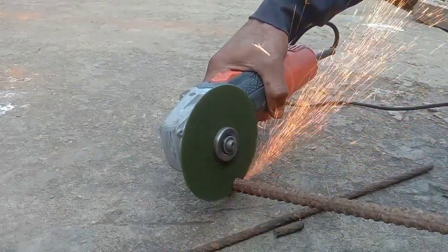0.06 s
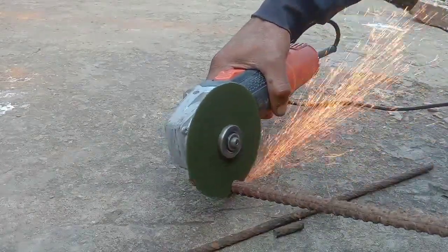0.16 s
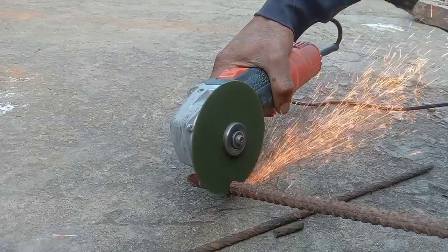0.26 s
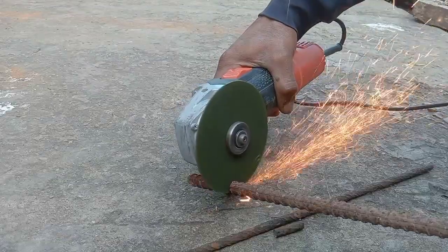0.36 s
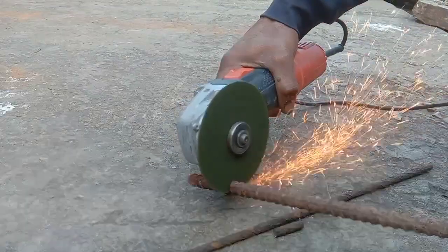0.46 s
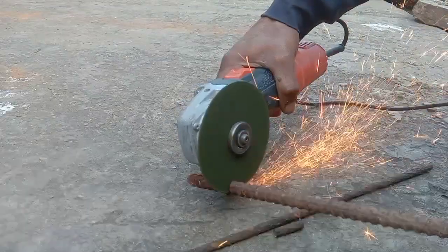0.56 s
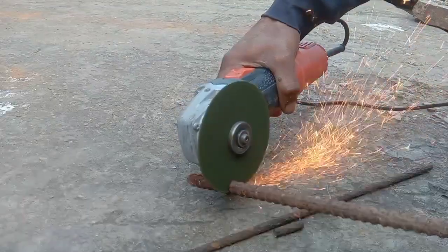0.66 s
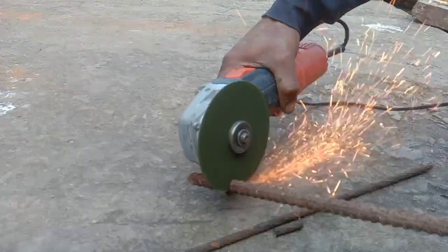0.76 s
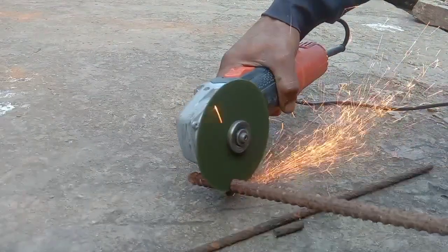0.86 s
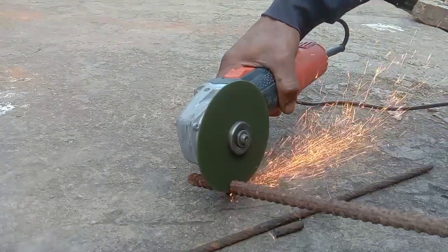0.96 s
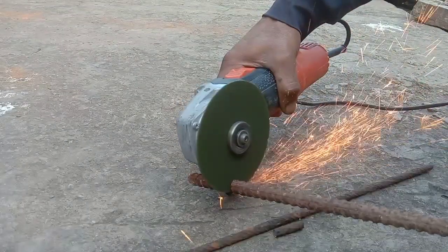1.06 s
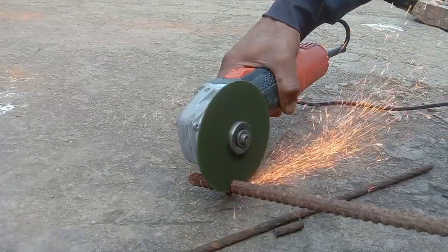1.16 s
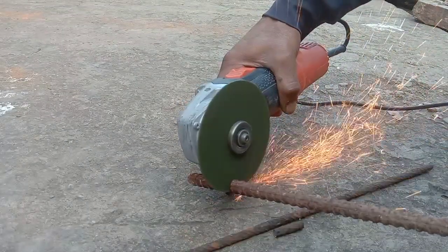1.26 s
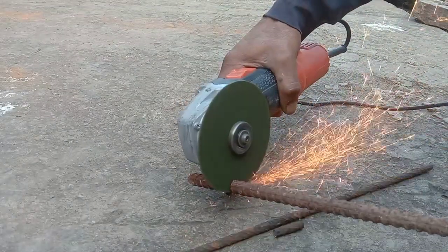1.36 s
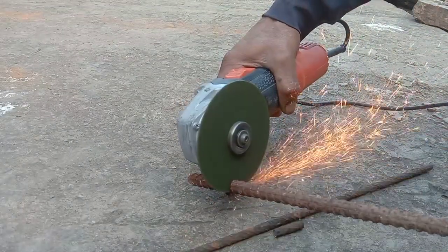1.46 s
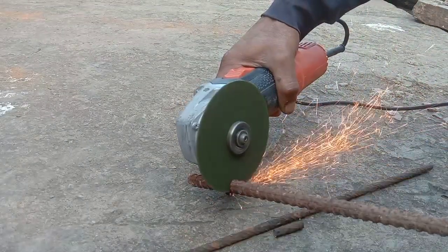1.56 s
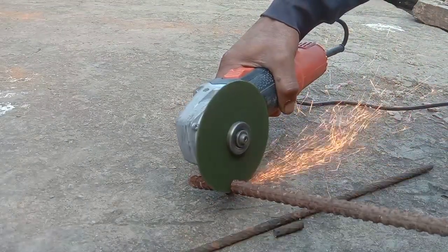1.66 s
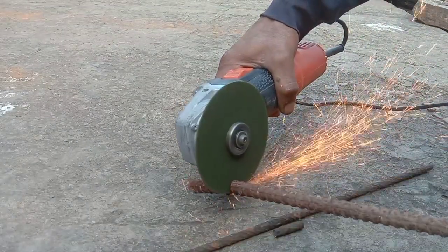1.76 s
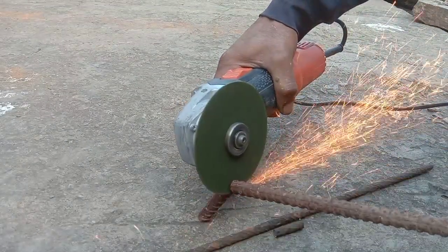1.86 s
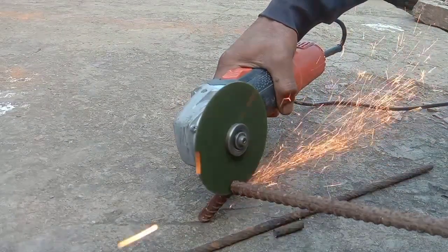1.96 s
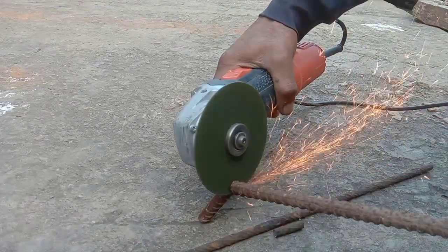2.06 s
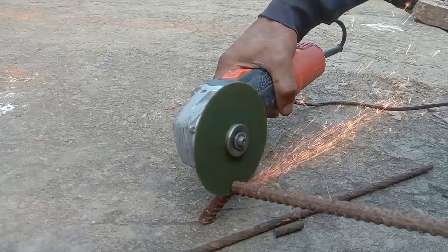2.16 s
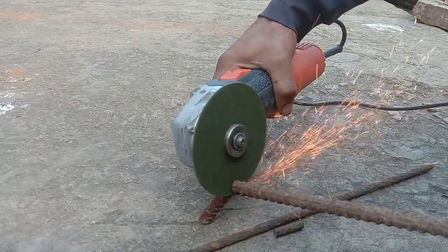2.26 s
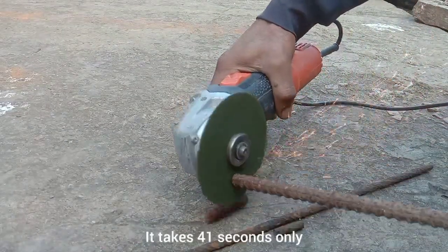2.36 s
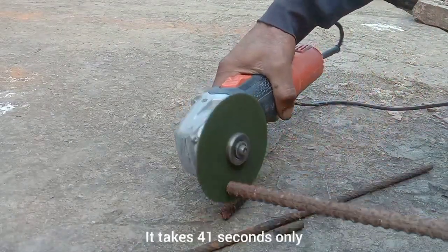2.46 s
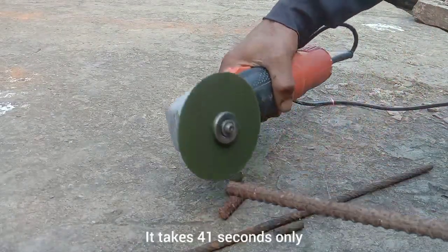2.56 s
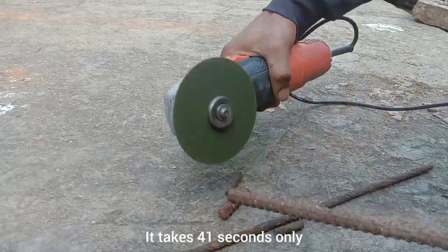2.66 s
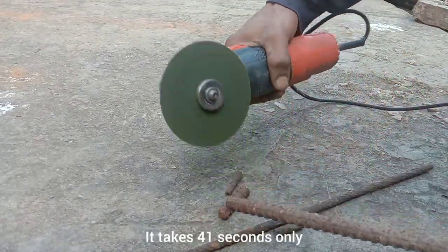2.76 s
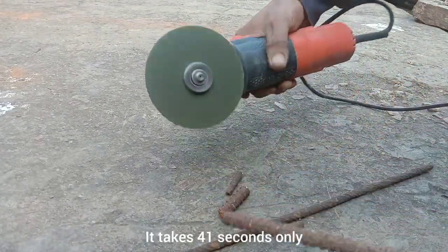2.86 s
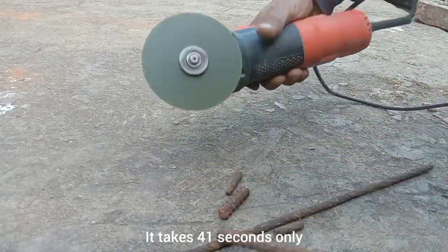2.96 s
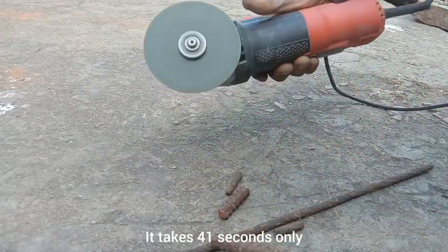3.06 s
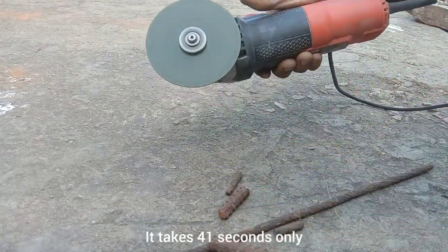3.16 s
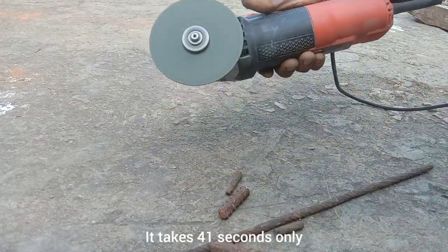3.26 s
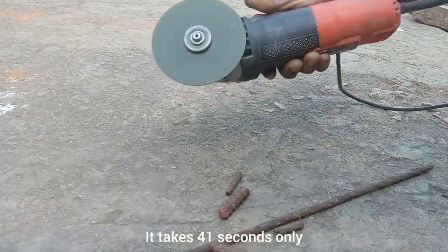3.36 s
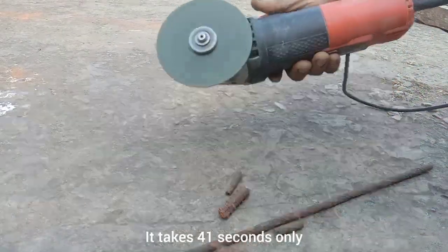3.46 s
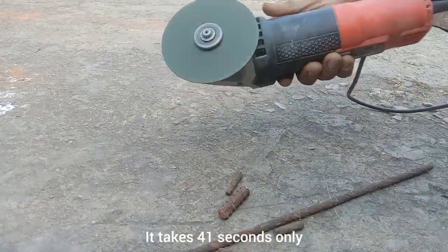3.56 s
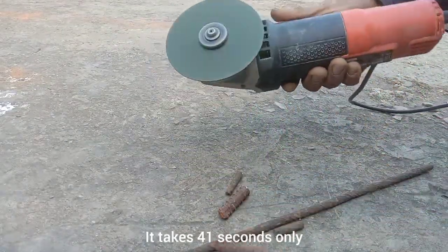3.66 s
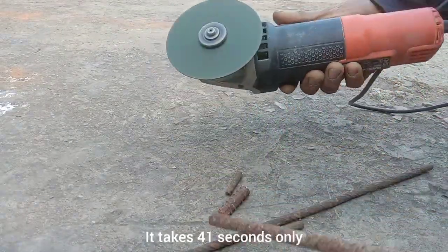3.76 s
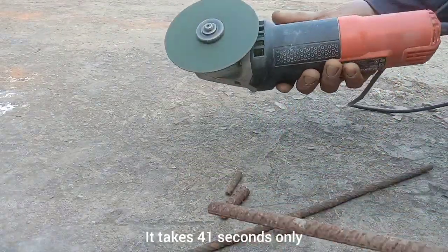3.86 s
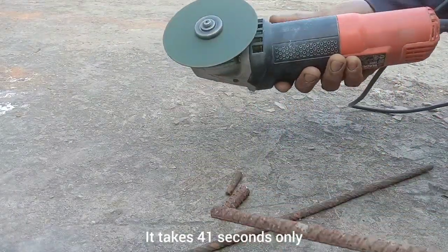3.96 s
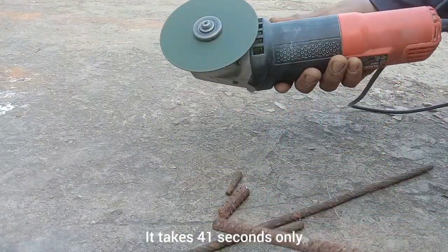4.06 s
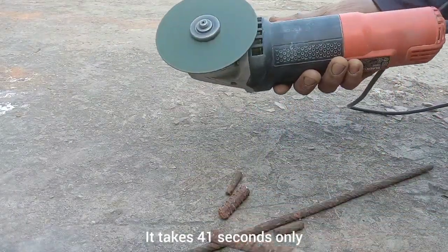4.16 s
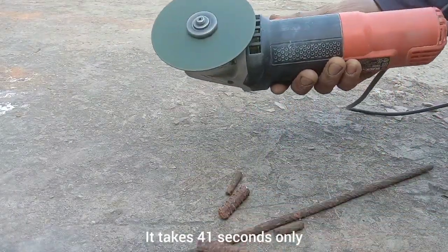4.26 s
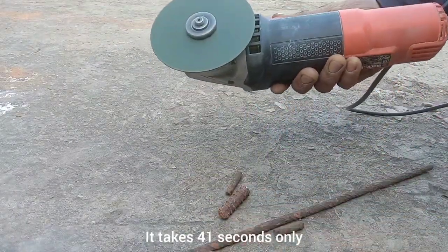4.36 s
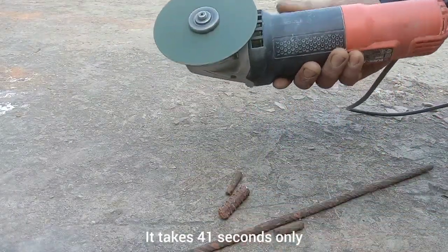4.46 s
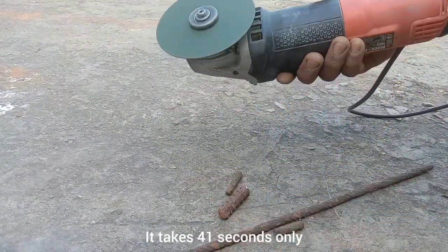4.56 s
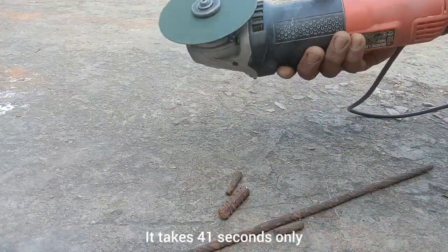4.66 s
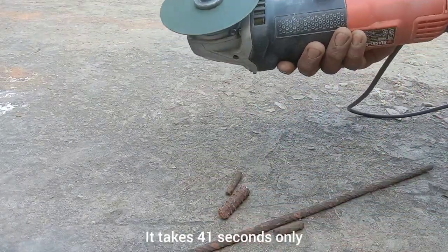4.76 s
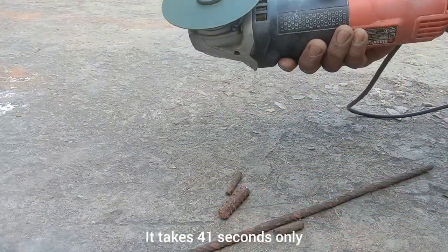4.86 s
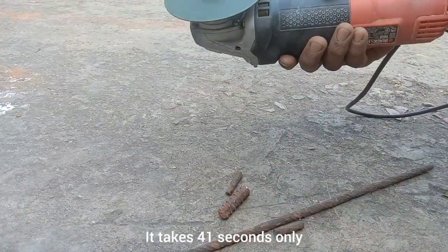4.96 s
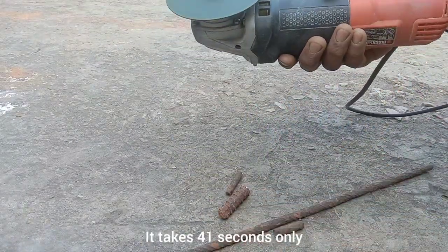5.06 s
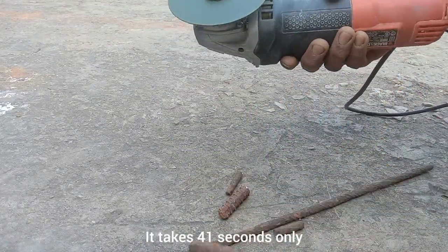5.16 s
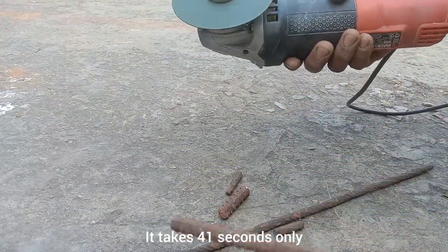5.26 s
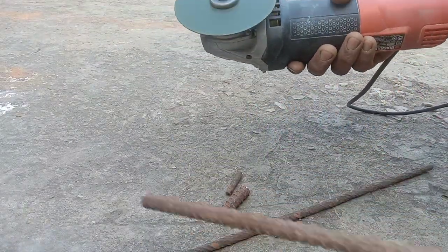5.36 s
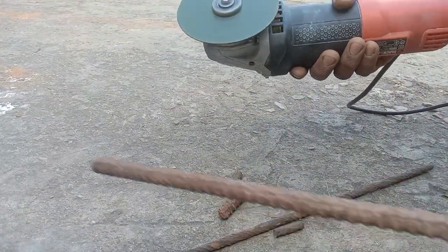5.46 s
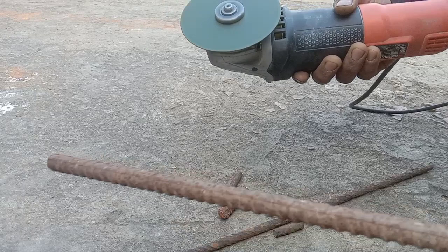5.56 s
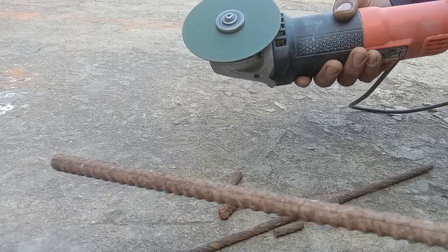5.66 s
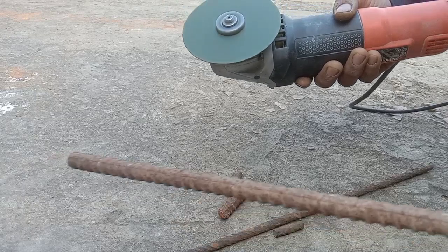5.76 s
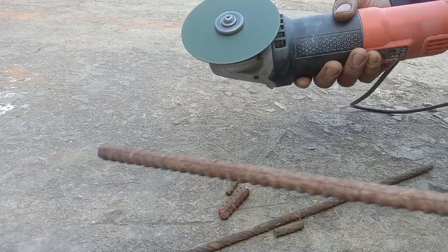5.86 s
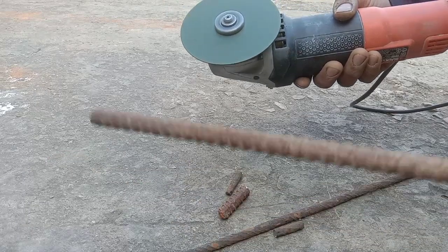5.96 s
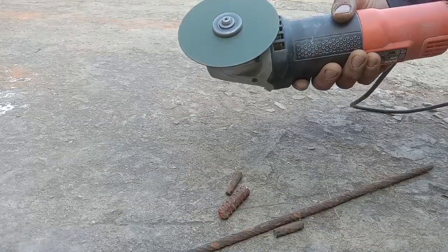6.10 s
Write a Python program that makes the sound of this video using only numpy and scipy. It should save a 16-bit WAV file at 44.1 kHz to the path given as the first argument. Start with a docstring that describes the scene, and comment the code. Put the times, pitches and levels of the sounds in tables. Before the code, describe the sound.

Harsh grinding squeal on steel breaks into quick chattering catches, then a bright free-running motor whine, falling in pitch and rattling after switch-off.

```python
"""An angle grinder cuts a steel rod outdoors: the disc squeals in the slot as harmonics of its turn rate,
while grit rasps as noise ringing the disc's modes and sparks hiss as coloured noise.
The rod snags and chirps as it parts; the motor then runs up, its fan roaring and its commutator whistling
as noise and partials locked to the shaft. Switched off, it slows while gears rattle in their backlash:
random taps ring the gear case."""
import sys
import numpy as np
from scipy import signal
from scipy.fft import rfft, irfft, next_fast_len
from scipy.io import wavfile

SR = 44100
rng = np.random.default_rng(int(sys.argv[2]) if len(sys.argv) > 2 else 0)


def unload_wav(signal):
    """Save mono or channel-first audio to the path in sys.argv[1] as 16-bit WAV at rate SR, clipped to [-1, 1]."""
    wavfile.write(
        sys.argv[1],
        SR,
        np.round(np.clip(np.atleast_2d(signal).T, -1, 1) * 32767).astype(np.int16),
    )


N = 270333

PINION_TEETH, CROWN_TEETH = 12, 37
PARTED_S, SWITCH_OFF_S = 2.51, 4.532
FREE_SPEED = 596.7  # motor turns per s with no load
# the disc bears on the steel, a long cut and then two catches on the parting stub:
# start_s, end_s, grit_db, tones_db
CONTACTS = [(-.05, 2.397, -1, 2), (2.424, 2.49, 2, -5), (2.483, 2.499, 2.5, -15)]
# modes of the disc against the rod: frequency_hz, relative_level_db, t60_s
DISC_MODES = [(1487, -8.5, 0.031), (1913, 1.5, 0.047), (2040, -2.5, 0.016), (2262, 3.5, 0.029),
              (2410, -4, 0.015), (3570, -4, 0.0022), (5880, -5.5, 0.0051)]


def from_db(db):
    """Amplitude gain is ten to the power of decibels over twenty."""
    return 10 ** (np.asarray(db) / 20)


def rms_one(x):
    """Equal power: a signal scaled to rms 1."""
    return x / np.sqrt(np.mean(x ** 2) + 1e-20)


def in_time(rows):
    """Linear interpolation of a (time in s, value) curve at every sample."""
    s, values = np.transpose(rows)
    return np.interp(np.arange(N) / SR, s, values)


def ramp(start_s, length_s):
    """Linear transition from 0 to 1 over this stretch."""
    return np.clip((np.arange(N) / SR - start_s) / length_s, 0, 1)


def swells(events, rise_s, fall_s):
    """Exponential growth to the peak of each (s, dB) event, then exponential decay."""
    t = np.arange(N) / SR
    gain = 0
    for s, db in events:
        distance = np.maximum((s - t) / rise_s, (t - s) / fall_s)
        gain = gain + from_db(db) * np.exp(-distance.clip(0, 20))
    return gain


def drift(rate_hz):
    """Slow random modulation of rms 1: white noise through two equal low-pass poles."""
    step = 40  # samples between the points of the slow signal
    r = np.exp(-2 * np.pi * rate_hz * step / SR)
    white = rng.standard_normal(N // step + 2002)
    slow = signal.lfilter([1], [1, -2 * r, r * r], white)[2000:]  # the filter has settled by then
    return np.interp(np.arange(N) / step, np.arange(len(slow)), rms_one(slow))


def housing_db(hz):
    """Resonant transmission: peaks and dips of the housing and the stone beneath."""
    # centre_hz, width_hz (between the points at half the dB), gain_db
    housing = [(740, 68, 2), (1223, 186, 5), (1933, 106, 4.5), (2455, 510, 6.5), (3830, 320, 3),
               (5530, 990, 4), (6360, 290, -10.5), (6510, 370, 6), (8170, 900, -6), (9730, 4100, 1),
               (14900, 1300, 10)]
    grid = np.linspace(0, SR / 2, num=2048)
    response_db = 0
    for centre, width, db in housing:
        response_db = response_db + db * 2 ** -((2 * (grid - centre) / width) ** 2)
    return np.interp(hz, grid, response_db)


def colour(source, spectrum, housed):
    """Spectral shaping of a source, through the housing or directly; rms 1."""
    size = next_fast_len(N)
    hz = np.arange(size // 2 + 1) * SR / size
    points = np.array(spectrum)
    db = np.interp(np.log(hz + 1), np.log(points[:, 0]), points[:, 1])
    db = db + housed * housing_db(hz)
    return rms_one(irfft(rfft(source, size) * from_db(db), size)[:N])


def noise(spectrum, housed):
    """Coloured noise: white noise given a spectrum, rms 1."""
    return colour(rng.standard_normal(N), spectrum, housed)


def tone(turns, multiple, rough, flutter_hz):
    """Harmonic locked to a shaft; a rough share of it wanders in strength and phase."""
    angle = 2 * np.pi * (multiple * turns + rng.random())
    wander = rough * (drift(flutter_hz) * np.sin(angle) + drift(flutter_hz) * np.cos(angle))
    return (np.sqrt(2) * np.sin(angle) + wander) / np.sqrt(1 + rough ** 2)


def ring(force, modes):
    """Modal synthesis: a force excites damped resonances, summed with alternating sign."""
    out = np.zeros(N)
    for k, (hz, db, t60) in enumerate(modes):
        r = from_db(-60 / (t60 * SR))
        w = 2 * np.pi * hz / SR
        response = signal.lfilter([.5, 0, -.5], [1, -2 * r * np.cos(w), r * r], force + 1e-18)
        out += (-1) ** k * from_db(db) * response
    return out


def blows(events, scrape_share, scrape_s):
    """Impact excitation: each blow is a click of force and a short, decaying gritty scrape."""
    force = np.zeros(N + SR)
    age = np.arange(SR // 20) / SR
    for s, db in events:
        scrape = rng.standard_normal(len(age)) * np.exp(-age / scrape_s)
        scrape = scrape / np.linalg.norm(scrape)
        at = int(s * SR)
        force[at:at + len(age)] += from_db(db) * ((age == 0) + scrape_share * scrape)
    return force[:N]


def motor_speed():
    """Rotational dynamics: slow under load, relaxing to free speed, then braked by drag and dry friction."""
    # speed under load, rising as the steel thins: time_s, turns_per_s
    loaded_speed = [(0, 549), (.23, 548.9), (.5, 553.8), (.8, 555.6), (1.1, 556), (2, 561.4), (2.464, 565)]
    run_up_s, coast_s = .43, 2.0  # time constants
    brush_drag = 21.8  # turns per s lost each second to dry friction
    t = np.arange(N) / SR
    held = in_time(loaded_speed)
    free_s = np.maximum(t - loaded_speed[-1][0], 0)
    off_s = np.maximum(t - SWITCH_OFF_S, 0)
    driven = FREE_SPEED + (held - FREE_SPEED) * np.exp(-free_s / run_up_s)
    friction = brush_drag * coast_s
    return (driven + friction) * np.exp(-off_s / coast_s) - friction


def contact():
    """Contact force: how hard the disc bears on the steel, as gains for grit and for tones."""
    attack_s, release_s = 0.017, 0.0042
    t = np.arange(N) / SR
    grit = tones = 0
    for start, end, grit_db, tones_db in CONTACTS:
        touch = ramp(start, attack_s) * np.exp(-np.clip((t - end) / release_s, 0, 20))
        grit = grit + from_db(grit_db) * touch
        tones = tones + from_db(tones_db) * touch
    return grit, tones


def squeal(disc_turns, loaded, touch, loose):
    """Periodic friction: rubbing that repeats every turn gives harmonics, rougher as the rod loosens."""
    # strength of the main pair, which slips once early on: time_s, level_db
    squeal_level = [(0, -16), (.13, -14.5), (.27, -16.5), (.33, -32), (.43, -19), (1.05, -18), (1.35, -19),
                    (1.85, -16), (2.05, -21)]
    # the pair, relative to that: level_db at first, change_db as the rod comes loose
    lower_squeal = (-4, -1.9)
    upper_squeal = (-4, -12.5)
    # weaker tones: multiple of the disc's turn rate, level_db before loosening
    disc_orders = [(1, -57.5), (3, -43), (4, -80), (5, -42.5), (6, -36.5), (7, -35), (8, -36.5), (9, -36),
                   (10, -41), (13, -29.5), (14, -36), (15, -60.5), (16, -46), (17, -37.5), (18, -39.5),
                   (19, -46), (20, -44), (21, -44.5), (22, -55), (23, -49), (27, -61), (28, -44.5),
                   (29, -46), (30, -41), (31, -55), (32, -52), (33, -44.5), (34, -45.5), (36, -47.5)]
    # the rod chirps as its last web gives: time_s, peak_db
    chirps = [(2.391, -19.5)]
    level_db = in_time(squeal_level)
    rough = 0.21 + 0.62 * loose

    # the rod drones ever louder as it comes loose, and sings along
    drone_db = -45.5 + 14 * ramp(1.19, 1.12)
    drone = from_db(drone_db) * tone(disc_turns, 2, rough=.12, flutter_hz=15)
    song_gain = from_db(-34.5) * touch + swells(chirps, rise_s=0.015, fall_s=0.0072)
    song = song_gain * tone(disc_turns, 8, rough=.35, flutter_hz=15)

    pair = 0
    for order, (db, loose_db) in [(11, lower_squeal), (12, upper_squeal)]:
        gain = from_db(level_db + db + loose_db * loose)
        pair = pair + gain * tone(disc_turns, order, rough, flutter_hz=28)
    weaker = 0
    for order, db in disc_orders:
        weaker = weaker + from_db(db) * tone(disc_turns, order, rough + .15, flutter_hz=14)
    return touch * (drone + pair) + song + loaded * from_db(-2 * loose) * weaker


def grinding(disc_turns, grit, loose):
    """Modulated noise excitation: grit bites hardest once a turn, ringing the disc and throwing sparks."""
    # frequency_hz, relative_level_db
    spark_spectrum = [(3000, -16.5), (7000, -11), (8200, -24), (10500, -12.5), (11500, -3), (12500, -11),
                      (13500, -12), (14100, -12), (14900, 4.5), (15600, -7.5)]
    rasp_db = -22 - 6 * (1 - ramp(0, .22))  # full strength once the disc has sunk in
    bite = rms_one(from_db(4.3 * np.sin(2 * np.pi * disc_turns) + 2.3 * drift(40)))
    rasp = from_db(rasp_db) * rms_one(ring(bite * rng.standard_normal(N), DISC_MODES))
    # the same grains on the rim come round on every turn, so part of the hiss repeats
    rim = signal.resample(rng.standard_normal(size=200), num=4096)
    place = (disc_turns % 1 * len(rim)).astype(int)
    grains = rim[place] * 0.35 + rng.standard_normal(N)
    sparks_db = -32.5 - 4 * loose
    sparks = from_db(sparks_db) * colour(grains * bite ** 0.36, spark_spectrum, housed=False)
    return grit * (rasp + sparks)


def motor(turns, speed, loaded, coasting, lifted):
    """Shaft harmonics: rotor hum and overtones, gear mesh at tooth rate, commutator whistle at bar rate."""
    # level of the gear whine: time_s, level_db
    mesh_level = [(0, -38.5), (1.1, -37.5), (1.8, -33.5), (2.3, -44), (2.68, -38.5), (2.9, -44.5),
                  (4.7, -43.5), (4.93, -32.5), (5.35, -36), (5.8, -47), (6.13, -38)]
    # resonance that the hum slides through when coasting: centre_hz, width_hz, gain_db
    hum_peak = (561, 70, 6.8)
    # overtones before housing, load and speed: multiple of the turn rate, driven_db, coasting_db
    rotor_orders = [(2, -36.5, -37), (3, -39, -31.5), (4, -39.5, -34), (5, -38, -34.5), (7, -50, -37),
                    (8, -45, -43), (9, -56, -45), (10, -58, -48), (11, -54, -47), (15, -57, -48),
                    (21, -66, -53), (23, -57, -60), (36, -75, -51)]
    commutator_bars = 24
    hum_power, overtone_power = 2.44, 1.73  # amplitude against speed
    relative_speed = speed / FREE_SPEED

    peak_hz, width_hz, peak_db = hum_peak
    resonance_db = coasting * peak_db * 2 ** -((2 * (speed - peak_hz) / width_hz) ** 2)
    # the hum recovers with this time constant once the long cut ends
    recovery_s = 0.31
    strain = np.exp(-np.maximum(np.arange(N) / SR - CONTACTS[0][1], 0) / recovery_s)
    hum_gain = from_db(-32.5 - 8.5 * strain + resonance_db) * relative_speed ** hum_power
    hum = hum_gain * tone(turns, 1, rough=.1 + .1 * coasting, flutter_hz=20)

    mesh_rough = .25 + .35 * coasting
    mesh = from_db(in_time(mesh_level)) * tone(turns, PINION_TEETH, mesh_rough, flutter_hz=25)

    # louder after the cut, weaker once the current is off
    whistle_db = -53 + 15 * lifted ** 2 - 8 * coasting + housing_db(commutator_bars * speed)
    whistle = from_db(whistle_db) * tone(turns, commutator_bars, rough=.25, flutter_hz=20)

    overtones = 0
    for order, driven_db, coasting_db in rotor_orders:
        hz = order * speed
        db = driven_db + coasting * (coasting_db - driven_db)
        # overtones swell as they slide through the housing's peaks; long waves radiate poorly
        radiated = from_db(db + housing_db(hz)) / (1 + (620 / hz) ** 6)
        overtones = overtones + radiated * tone(turns, order, rough=.3, flutter_hz=12)
    overtones = overtones * from_db(-4 * loaded) * relative_speed ** overtone_power
    return hum + mesh + whistle + overtones


def air(turns, speed, loaded, coasting, lifted):
    """Turbulence and friction noise: fan rush; brush and gear hiss, pulsing once a turn when coasting."""
    # spectra before the housing: frequency_hz, relative_level_db
    rush_spectrum = [(30, -53), (100, -30), (200, -21.5), (300, -10.5), (400, -10), (540, 0.5), (1000, 3),
                     (1600, 2.5), (2600, -8), (4500, -15.5), (8000, -36), (15500, -36)]
    hiss_spectrum = [(300, -43.5), (1000, -12.5), (2000, -1.5), (3000, 3), (4400, -8.5), (6000, -8),
                     (8000, -22), (10000, -19.5), (12500, -24), (15500, -21.5)]
    rush_knee = 328  # turns per s below which the rush dies away
    rush_gain = from_db(-26.5 - 2 * loaded) / np.sqrt(1 + (rush_knee / speed) ** 6)
    rush = rush_gain * noise(rush_spectrum, housed=True)

    hiss_db = -25 + 5.5 * lifted - 3.5 * coasting
    hiss = noise(hiss_spectrum, housed=True) * (speed / FREE_SPEED) ** 1.15
    # slow brushes lose the top of their hiss
    dull = signal.sosfiltfilt(signal.butter(2, 5500, fs=SR, output="sos"), hiss)
    bright = np.clip(speed / 350, 0, 1) ** 3
    uneven_db = 0.86 * drift(60) + 3 * coasting * np.sin(2 * np.pi * turns)
    return rush + from_db(hiss_db + uneven_db) * (dull + bright * (hiss - dull))


def parting():
    """Impact and sliding friction: the loosened rod snags on the disc, and the falling stub scrapes its flank."""
    # snags: time_s, relative_level_db
    snag_events = [(1.9726, -3), (2.0175, -8), (2.1724, -7), (2.1844, -3), (2.2905, -6), (2.3024, -13),
                   (2.3335, -5), (2.3914, -5), (2.3984, -9), (2.4225, -2.5), (2.4374, -8), (2.4382, 0.5),
                   (2.4452, -16), (2.4564, -9), (2.4872, -5.5), (2.4988, -16)]
    # scrapes: time_s, peak_db
    scrape_events = [(2.44, -21), (2.49, -40)]
    # frequency_hz, relative_level_db
    scrape_spectrum = [(60, -22), (200, -18), (600, -6), (2300, 4.5), (4500, 2.5), (7000, -14),
                       (10000, -14), (15000, -16)]
    snags = ring(blows(snag_events, scrape_share=0.59, scrape_s=0.0077), DISC_MODES)
    scrape_gain = swells(scrape_events, rise_s=.012, fall_s=0.018)
    return from_db(-11.5) * snags + scrape_gain * noise(scrape_spectrum, housed=False)


def backlash(speed):
    """Random impacts on a resonator: unloaded teeth tap ever more sparsely, with a few harder knocks."""
    # modes of the gear case: frequency_hz, relative_level_db, t60_s
    case_modes = [(790, -26, 0.048), (1165, -12, 0.02), (1900, -7, 0.019), (2360, 4, 0.0057),
                  (2710, -3.5, 0.015), (3710, 1.5, 0.0024), (5110, -3.5, 0.013), (5600, -6, 0.0046),
                  (7000, -11, 0.008), (10740, 0, 0.0054)]
    # loose teeth knock: time_s, blow_db
    knock_events = [(5.2916, -23), (5.3265, -10), (5.6295, -19), (5.687, -13), (5.769, -13.5), (5.885, -15),
                    (5.9157, -13.5), (5.9526, -18), (5.9982, -16.5), (6.028, -21), (6.1038, -20)]
    # the rattle builds after switch-off, then settles from 316 turns per s down over a range of 44
    settled = np.clip((316 - speed) / 44, 0, 1)
    rattle_gain = from_db(-23.5 - 11.5 * settled) * ramp(SWITCH_OFF_S, 0.63)

    mean_taps_per_s = 3500 * (speed / FREE_SPEED) ** 2
    clumping = from_db(3 * drift(60))  # swing of the tap rate
    tapping = rng.random(N) < mean_taps_per_s * clumping / SR
    force = tapping / np.sqrt(mean_taps_per_s)
    # every tap lands elsewhere, and so strikes each mode with a strength of its own
    taps = 0
    for mode in case_modes:
        strength = np.clip(rng.standard_normal(N), -2, 2)
        taps = taps + ring(force * strength, [mode])
    grease = signal.butter(2, 5000, fs=SR, output="sos")  # the film of grease softens each contact
    rattle = rattle_gain * rms_one(signal.sosfilt(grease, taps))

    knocks = ring(blows(knock_events, scrape_share=.25, scrape_s=.0012), case_modes)
    hard_knocks = signal.sosfilt(signal.butter(2, 3800, fs=SR, output="sos"), knocks)
    return rattle + hard_knocks


def scene():
    """Superposition: one shaft drives machine and cut over faint outdoor noise, alike in both channels."""
    # frequency_hz, relative_level_db
    outdoor_spectrum = [(20, -10), (45, -10), (100, -2), (250, 9), (1000, -4), (4000, -31), (15000, -42)]
    speed = motor_speed()
    loaded = 1 - ramp(PARTED_S - 0.065, 0.11)
    lifted = ramp(PARTED_S, 1.96)
    coasting = ramp(SWITCH_OFF_S, 0.17)
    loose = ramp(0, PARTED_S) ** 3  # the rod gives as its web thins
    grit, touch = contact()
    # the speed wavers, more so under the uneven bite
    waver = (0.00021 + 0.0003 * loaded) * drift(5.9)
    turns = np.cumsum(speed * (1 + waver)) / SR
    disc_turns = turns * PINION_TEETH / CROWN_TEETH

    cut = squeal(disc_turns, loaded, touch, loose) + grinding(disc_turns, grit, loose) + parting()
    machine = motor(turns, speed, loaded, coasting, lifted)
    machine = machine + air(turns, speed, loaded, coasting, lifted) + backlash(speed)
    outdoors = from_db(-56.5) * noise(outdoor_spectrum, housed=False)
    sound = machine + cut + outdoors
    return np.array([sound, sound])


def record(dry):
    """Band limiting: the microphone drops the deep bass, and the top is cut steeply."""
    high_pass = signal.butter(2, 65, "high", fs=SR, output="sos")
    low_pass = signal.ellip(16, .1, 80, 15480, fs=SR, output="sos")
    return signal.sosfilt(low_pass, signal.sosfilt(high_pass, dry))


dry = scene()
out = record(dry)
unload_wav(out)
```